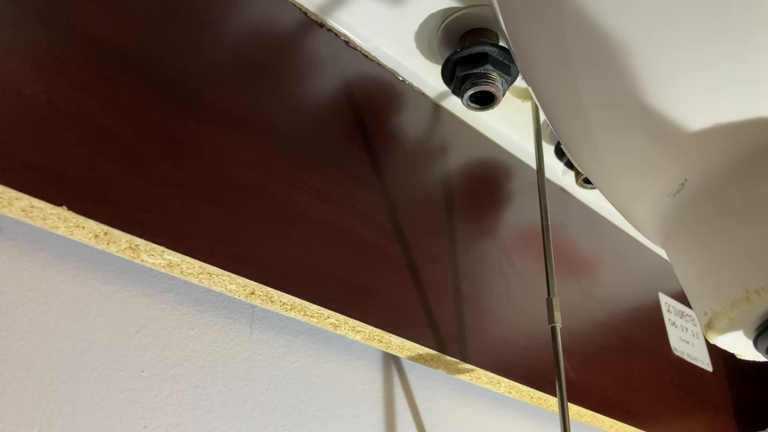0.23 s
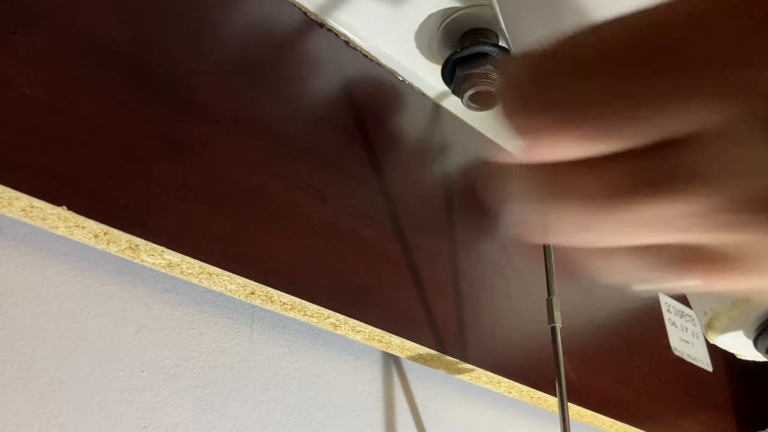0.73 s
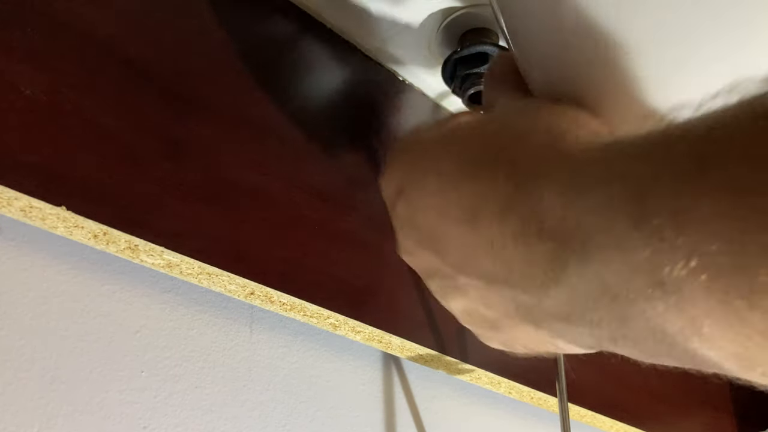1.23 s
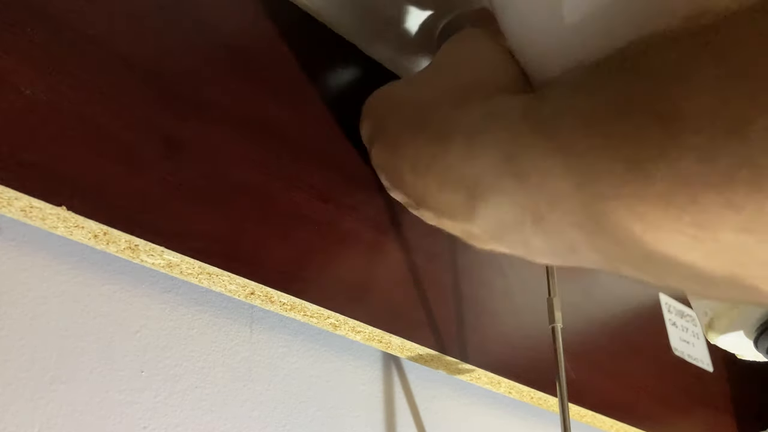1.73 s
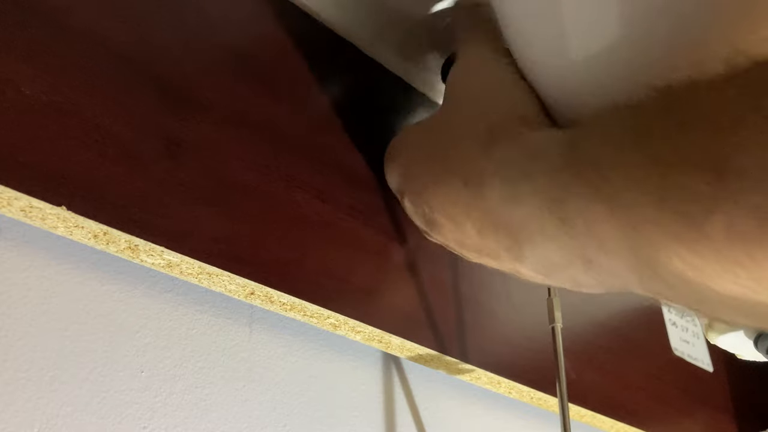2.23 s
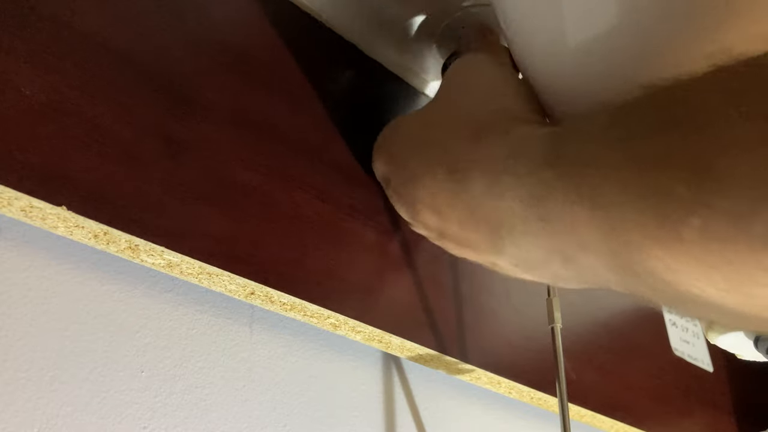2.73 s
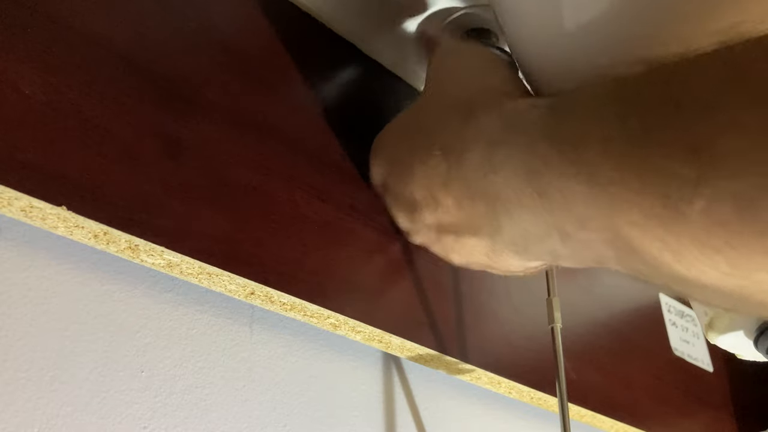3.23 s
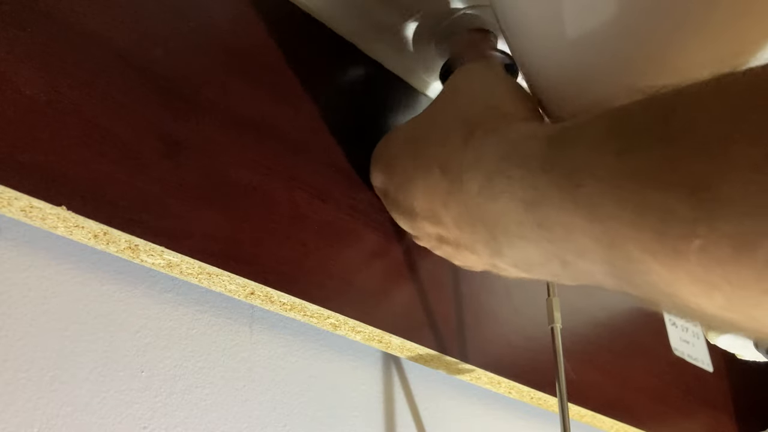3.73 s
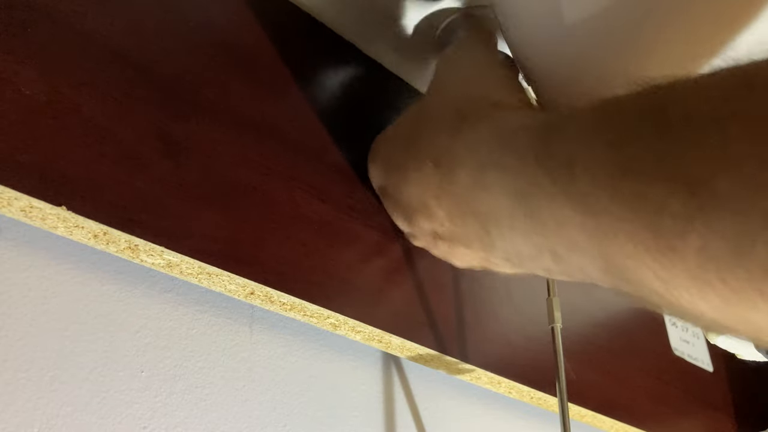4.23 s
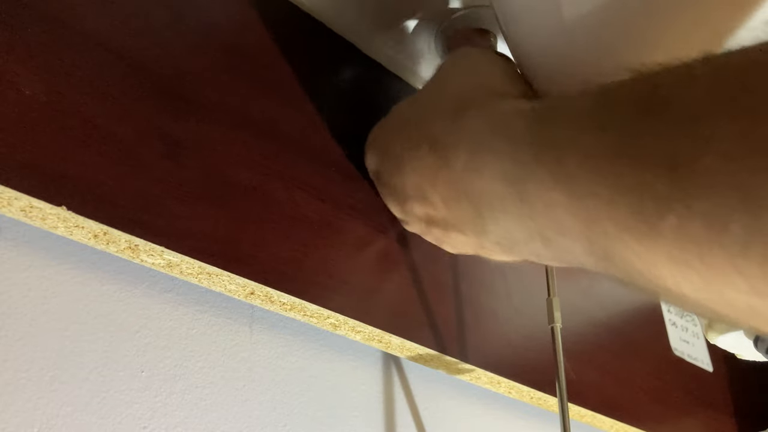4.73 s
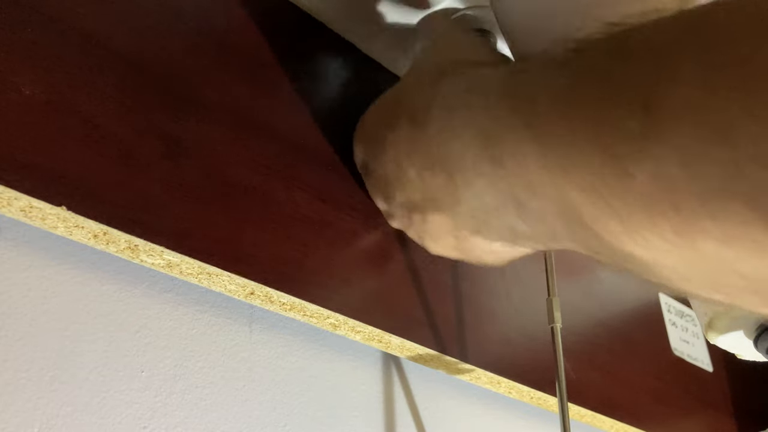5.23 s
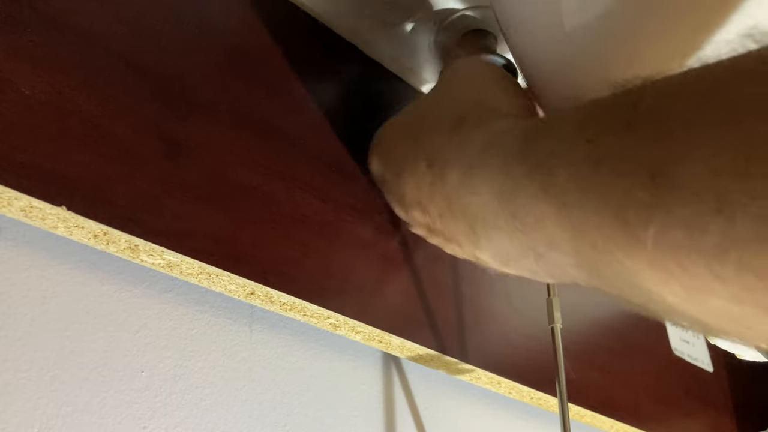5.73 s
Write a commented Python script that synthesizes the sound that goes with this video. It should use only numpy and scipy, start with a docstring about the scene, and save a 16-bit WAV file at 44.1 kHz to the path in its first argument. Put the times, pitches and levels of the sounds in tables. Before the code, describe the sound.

Close under a sink, quick irregular drips plop with a hollow low boom into a tub for about two seconds. A hand brushes in with a soft bump, then turns a plastic nut in dry, scratchy flicks about three a second, with hollow clicks and bright ticks. A sharp bouncing knock rings near the middle; later, dull basin thumps grow stronger. Low rumble and faint room tone lie beneath.

```python
"""Water drips into a tub under a sink, while a hand in the small cabinet unscrews a plastic nut from a tap's shank.
Fingers rub and the thread scratches: stick-slip noise, shaped by pushes and slides of the hand.
Noise bursts make clicks and ticks; decaying modes make bumps on the basin and one sharp, bouncing knock.
Each drip is a splash of noise over two decaying sines; a low filtered rumble and room tone lie underneath."""
import sys
import numpy as np
from scipy import signal
from scipy.fft import rfft, irfft, next_fast_len
from scipy.io import wavfile

SR = 44100
rng = np.random.default_rng(int(sys.argv[2]) if len(sys.argv) > 2 else 0)


def store_wav(level_fs):
    """Save 16-bit WAV to argv[1]."""
    pcm = np.round(np.clip(np.atleast_2d(level_fs), -1, 1) * 32767)
    wavfile.write(sys.argv[1], SR, pcm.T.astype(np.int16))


N = 263718
AGE = np.arange(2 * SR // 5) / SR   # seconds since a contact began; each contact lasts at most 0.4 s

# Resonances and one dip of the scraped nut.
# Each row: centre in Hz, half width in Hz, lift in dB (negative for the dip).
NUT_PEAKS = [(1144, 18.7, 13), (1407, 76, 10.5), (1703, 30, 6), (2230, 15, -14), (3140, 9.8, 16.5),
             (3680, 200, 3.5)]


def amp(db):
    """Decibels to gain."""
    return 10 ** (np.asarray(db) / 20)


def rms_one(x):
    """Scale to rms 1."""
    return x / np.sqrt(np.mean(x ** 2) + 1e-20)


def at_hz(points, hz):
    """Read a curve over frequency on a logarithmic axis."""
    f, value = np.transpose(points)
    return np.interp(np.log(hz + 1), np.log(f), value)


def noise(spectrum, peaks=(), ripple_db=0, size=N):
    """Stereo noise of rms 1, coloured by a spectrum, named peaks and a random ripple of crowded modes."""
    # Likeness of the two channels. Each row: frequency in Hz, correlation from -1 to 1.
    likeness = [(150, 0.97), (550, 0.56), (1200, 0.24), (5000, 0.058)]
    excitation = rng.standard_normal((2, size))
    fft_size = next_fast_len(size)
    hz = np.fft.rfftfreq(fft_size, 1 / SR)
    crowded = np.interp(hz, np.linspace(0, SR / 2, 400), rng.standard_normal(400))
    db = at_hz(spectrum, hz) + ripple_db * crowded
    for f, width, lift in peaks:
        db = db + lift / (1 + ((hz - f) / width) ** 2)
    mid, side = rfft(excitation, fft_size) * amp(db)
    alike = np.clip(at_hz(likeness, hz), -1, 1)
    pair = np.sqrt(1 + alike) * mid + np.sqrt(1 - alike) * side * [[1], [-1]]
    return rms_one(irfft(pair, fft_size)[:, :size])


def fade(t60):
    """Decay by 60 dB in t60 seconds."""
    return np.exp(-np.log(1000) * AGE / t60)


def swell(rise_s):
    """Soft onset that approaches full level with time constant rise_s."""
    return 1 - np.exp(-AGE / rise_s)


def add(out, s, sound):
    """Mix a sound in at time s in seconds."""
    start = max(round(s * SR), 0)
    out[:, start:start + len(AGE)] += sound[:, :out.shape[1] - start]


def burst(spectrum, t60, tail_db, peaks=(), ripple_db=3):
    """A contact on densely spaced modes: noise with a quick decay, then the cabinet's weaker tail."""
    cabinet_t60 = .14   # seconds
    decay = fade(t60) + amp(tail_db) * fade(cabinet_t60)
    return noise(spectrum, peaks, ripple_db, size=len(AGE)) * decay


def ring(modes, vary_db, detune, spread):
    """Struck modes; each blow has its own strengths and tuning, each mode its own phase at the two ears."""
    out = 0
    for hz, db, t60 in modes:
        strength, shift, phase = rng.standard_normal(3)
        ear_phase = spread * phase * np.array([[1], [-1]])   # radians
        turn = 2 * np.pi * hz * (1 + detune * shift) * AGE + ear_phase
        out = out + amp(db + vary_db * strength) * np.sin(turn) * fade(t60)
    return out


def turning(scratch_db=6.0, rub_db=1):
    """Each flick of the fingers has two swells of pressure: they tighten, then push the nut round."""
    # Flicks that spin the nut, about three a second. Each row: middle of the push in seconds,
    # spread (Gaussian sigma) of the push in seconds, thread scratch and skin rub in dB before the trims.
    flicks = [(2.12, 0.023, -49.5, -49.5), (2.487, 0.037, -51, -53.5), (2.851, 0.019, -50.5, -50),
              (3.19, 0.033, -56, -59.5), (3.522, 0.025, -52.5, -55), (3.846, 0.044, -45, -53),
              (4.151, 0.022, -50, -54), (4.487, 0.053, -60.5, -62.5), (4.824, 0.028, -48.5, -53),
              (5.19, 0.024, -57.5, -56.5), (5.479, 0.026, -49.5, -50.5), (5.79, 0.024, -45.5, -50)]
    grip_lead_s, grip_spread_s = 0.062, 0.028
    grip_scratch_db, grip_rub_db = -15.5, -5.5   # against the push
    out, middle = np.zeros((2, N)), AGE.mean()
    for s, push_s, scratch, rub in flicks:
        grip = (s - grip_lead_s, grip_spread_s, scratch + grip_scratch_db, rub + grip_rub_db)
        push = (s, push_s, scratch, rub)
        for at, spread_s, thread_db, skin_db in (grip, push):
            pressure = np.exp(-.5 * ((AGE - middle) / spread_s) ** 2)
            add(out, at - middle, pressure * friction(thread_db + scratch_db, skin_db + rub_db))
    return out


def sliding(scratch_db=4, rub_db=.5):
    """A slide sets in quickly, keeps its pressure and dies as the fingers stop."""
    # The hand reaches in, finds the nut and takes new grips. Each row: start in seconds,
    # length in seconds, thread scratch and skin rub in dB before the trims.
    slides = [(0, 0.061, -56.5, -54), (0.161, 0.036, -76, -58), (0.289, 0.19, -68, -67),
              (0.499, 0.043, -71, -57), (0.999, 0.075, -47, -53), (1.21, 0.08, -78, -69),
              (1.402, 0.34, -94, -65), (1.531, 0.35, -65.5, -61.5), (2.177, 0.11, -64, -62),
              (2.565, 0.06, -54.5, -51), (2.658, 0.016, -59.5, -58), (2.921, 0.098, -75, -54.5),
              (3.039, 0.11, -61.5, -60.5), (3.237, 0.099, -74.5, -59), (3.399, 0.062, -59, -63),
              (3.655, 0.036, -67, -57), (3.717, 0.02, -61.5, -59), (3.94, 0.094, -63.5, -60),
              (4.225, 0.17, -70.5, -60), (4.657, 0.029, -68, -57.5), (4.971, 0.037, -72, -55.5),
              (5.053, 0.084, -59.5, -60.5), (5.243, .08, -70.5, -55.5), (5.357, 0.02, -56.5, -64),
              (5.601, 0.055, -65.5, -57), (5.895, 0.041, -66, -48.5), (5.951, 0.034, -67, -62)]
    attack_s, release_s = .005, .017   # time constants
    out = np.zeros((2, N))
    for s, length, scratch, rub in slides:
        release = np.exp(-np.maximum(AGE - length, 0) / release_s)
        pressure = swell(attack_s) * release
        add(out, s, pressure * friction(scratch + scratch_db, rub + rub_db))
    return out


def friction(scratch_db, rub_db):
    """One touch: plastic scratches while skin slides over the ribs, and each new grip shifts the colour."""
    # Colours of thread scratch and skin rub. Each row: frequency in Hz, relative level in dB per Hz.
    scratch_colour = [(150, -14), (320, 10), (480, -5), (850, -2.5), (1400, -4.5), (2400, -3.5),
                      (2850, -12), (5000, -12), (9000, -38)]
    rub_colour = [(1500, -16.5), (4000, -7), (6000, -8), (8000, 0), (12000, -2.5), (15500, -12.5)]
    coarse = grit(slips_per_s=260, size_db=3.2, slip_t60=.045)
    thread = coarse * noise(scratch_colour, NUT_PEAKS, ripple_db=4.5, size=len(AGE))
    fine = grit(slips_per_s=550, size_db=9.0, slip_t60=0.2)
    skin = fine * noise(rub_colour, ripple_db=6.5, size=len(AGE))
    return amp(scratch_db) * thread + amp(rub_db) * skin


def grit(slips_per_s, size_db, slip_t60):
    """Envelope of stick and slip: tiny releases of uneven size, each dying away, summed in power; rms 1."""
    sizes = amp(size_db * np.minimum(rng.exponential(1, len(AGE)), 3))
    slips = (rng.random(len(AGE)) < slips_per_s / SR) * sizes
    power = irfft(rfft(slips ** 2) * rfft(fade(slip_t60) ** 2), len(AGE))
    return rms_one(np.sqrt(np.abs(power)))


def knocks(crack_db=-8, ring_db=-15.5):
    """The loose nut hits the shank and bounces; each hard crack leaves nut and shank ringing."""
    # Knock and bounces. Each row: start in seconds, level in dB before the trims.
    hits = [(3.8478, -16.5), (3.8531, -21), (3.861, -29), (3.886, -23)]
    # What nut and shank ring with. Each row: frequency in Hz, relative level in dB, t60 in seconds.
    shank_modes = [(956, -19, 0.56), (1390, -2, 0.15), (1385, 6, 0.12), (1600, 1.5, 0.16),
                   (2040, -23, 0.19), (2474, -5, 0.1), (2440, -5.5, 0.11), (3480, -10, 0.11),
                   (4500, -5.5, 0.13), (4950, -1, 0.14), (4893, -1, 0.12), (6270, -15, 0.16),
                   (9840, 4.5, 0.036), (10300, -24, 0.071), (11900, 6.5, 0.031), (12630, 2, 0.045)]
    # Colour of the crack. Each row: frequency in Hz, relative level in dB per Hz.
    crack_colour = [(400, -2), (1100, -33), (1450, 8), (2450, 7), (2850, -20), (3400, -20), (5200, 4),
                    (8500, -8.5), (12000, -6), (16000, 0.5)]
    out = np.zeros((2, N))
    for s, db in hits:
        crack = burst(crack_colour, t60=.04, tail_db=-12)
        tone = ring(shank_modes, vary_db=3.0, detune=0.00052, spread=1.27)
        add(out, s, amp(db) * (amp(crack_db) * crack + amp(ring_db) * tone))
    return out


def clicks(catch_db=-4, tick_db=-7):
    """The nut catches on the thread with a hollow click; fingernail and plastic edges tick brightly."""
    # Thread catches, then bright ticks. Each row: start in seconds, level in dB before the trim.
    catches = [(1.004, -39.5), (1.612, -38.5), (1.643, -41.5), (2.199, -38.5), (2.509, -35), (2.602, -37.5),
               (2.846, -44), (2.913, -45.5), (3.044, -43), (3.461, -40), (3.537, -31), (4.007, -39.5),
               (4.212, -43), (4.308, -43), (4.994, -44), (5.378, -47)]
    ticks = [(0.15, -38.5), (0.183, -35.5), (0.504, -45.5), (0.9, -52), (1.004, -45), (2.4669, -26.5),
             (3.169, -39), (4.543, -45.5), (5.188, -31), (5.571, -43), (5.793, -27.5), (5.8903, -33.5)]
    # Colours of catch and tick. Each row: frequency in Hz, relative level in dB per Hz.
    catch_colour = [(500, 11.5), (1000, -1.5), (1450, 7.5), (1900, 7.5), (2500, 1.5), (3500, -18),
                    (8000, -47)]
    tick_colour = [(1500, -4.5), (5000, 0.5), (8000, 6.5), (11500, 8.5), (16000, -1)]
    out = np.zeros((2, N))
    for s, db in catches:
        click = burst(catch_colour, t60=.055, tail_db=-7, peaks=NUT_PEAKS) * swell(rise_s=.0008)
        add(out, s, amp(db + catch_db) * click)
    for s, db in ticks:
        tick = burst(tick_colour, t60=.025, tail_db=-6)
        add(out, s, amp(db + tick_db) * tick)
    return out


def bumps(upper_db=3):
    """Soft blows of the hand swell into the basin's modes; the grip damps and detunes them."""
    # Dull bumps on the basin. Each row: time in seconds, level of the low modes in dB,
    # level of the upper modes in dB before the trim.
    blows = [(1.02, -34, -41.5), (1.078, -40, -46), (1.704, -34.5, -52.5), (2.101, -32, -66),
             (2.137, -35.5, -54), (2.207, -34, -50), (2.45, -36, -52.5), (2.526, -32, -60),
             (2.614, -35, -53), (2.856, -39, -58), (3.05, -36.5, -63), (3.117, -36, -44.5),
             (3.635, -38.5, -50.5), (3.753, -37.5, -49), (3.811, -40, -34.5), (3.832, -32.5, -31),
             (4.259, -39, -62), (4.396, -36, -58), (4.843, -28, -37), (4.862, -34, -50),
             (4.962, -40.5, -48), (5.058, -33, -46), (5.112, -26, -31), (5.218, -34.5, -48.5),
             (5.373, -37, -46.5), (5.424, -31, -42), (5.519, -35.5, -42), (5.605, -34, -46),
             (5.812, -38.5, -44), (5.935, -32.5, -48.5)]
    # What the basin rings with. Each row: frequency in Hz, relative level in dB, t60 in seconds.
    low_modes = [(101.9, -19, 0.91), (143.7, -3, 0.26), (232, -1.5, 0.11), (292.7, 2, 0.14),
                 (341.3, -4.5, 0.18)]
    upper_modes = [(450.5, 1.5, 0.051), (537.7, 0, 0.079), (605, -16, 0.17)]
    out = np.zeros((2, N))
    for s, db, upper in blows:
        low = amp(db) * ring(low_modes, vary_db=1.5, detune=0.0773, spread=0.25)
        high = amp(upper + upper_db) * ring(upper_modes, vary_db=1.5, detune=0.029, spread=0.23)
        add(out, s - .002, (low + high) * swell(rise_s=0.0022))   # starts 2 ms early
    return out


def drips(boom_db=7, overtone_db=5, splash_db=-29.5):
    """A drop splashes, then the tub's floor swings up and booms; bigger drops do both more loudly."""
    # Drops landing in the tub. Each row: start in seconds, boom in dB before the trims.
    drops = [(0.0, -36), (0.067, -46.5), (0.15, -30), (0.199, -42), (0.238, -40), (0.295, -36),
             (0.438, -31.5), (0.578, -37), (0.71, -32), (0.836, -38), (0.958, -32.5), (1.182, -33),
             (1.288, -39.5), (1.391, -34), (1.488, -40.5), (1.582, -35), (1.755, -35), (1.916, -37.5),
             (1.992, -45.5), (2.062, -41), (2.327, -41)]
    # The tub's note steps up, then its overtone slowly weakens. Each row: time in seconds,
    # boom pitch in Hz, overtone in dB against the boom before the trims.
    tub_note = [(0.44, 217, -22), (0.57, 272.5, -12), (1.2, 270, -14.5), (2.3, 287, -28)]
    # Colour of the splash. Each row: frequency in Hz, relative level in dB per Hz.
    splash_colour = [(500, -5), (780, -1), (970, 4.5), (1100, -3.5), (1280, 9), (1550, -18), (2600, -16),
                     (5000, -47)]
    splash_follows = 0.58   # dB of splash for each dB of boom
    boom_t60, overtone_hz, overtone_t60 = 0.07, 524, 0.13   # seconds, Hz, seconds
    out = np.zeros((2, N))
    when, pitches, overtones = np.transpose(tub_note)
    for s, boom in drops:
        hz = np.interp(s, when, pitches)
        overtone = boom + np.interp(s, when, overtones)
        low = amp(boom + boom_db) * np.sin(2 * np.pi * hz * AGE) * fade(boom_t60)
        sloshing = 1 + 0.019 * rng.standard_normal()   # moving water detunes the overtone
        high_wave = np.sin(2 * np.pi * overtone_hz * sloshing * AGE)
        high = amp(overtone + overtone_db) * high_wave * fade(overtone_t60)
        tub = 2 * (low + high) * swell(rise_s=0.0048) ** 2
        splat = burst(splash_colour, t60=.07, tail_db=-9, ripple_db=1.5) * swell(rise_s=.0005)
        add(out, s, amp(splash_follows * boom + splash_db) * splat + tub)
    return out


def rumble():
    """The cabinet's panels rumble under the moving arm: low noise that follows its leaning."""
    # The arm leans and shifts against the cabinet. Each row: time in seconds, rumble level in dB.
    leaning = [(0, -48), (.98, -52.5), (1.04, -37), (1.2, -49), (1.75, -45.5), (3.58, -47), (3.68, -39),
               (4.03, -42), (4.2, -49), (5.3, -38.5), (5.57, -44), (5.98, -43.5)]
    # Colour of the panels. Each row: frequency in Hz, relative level in dB per Hz.
    panel_colour = [(22, -30), (38, -12), (55, 1.5), (72, -6), (98, 5.5), (140, -4), (190, -17.5),
                    (300, -12), (430, -31), (1500, -67)]
    when, level_db = np.transpose(leaning)
    return amp(np.interp(np.arange(N) / SR, when, level_db)) * noise(panel_colour)


def room_tone(level_db=-53):
    """Steady filtered noise as the quiet bed under everything."""
    # Colour of the bed. Each row: frequency in Hz, relative level in dB per Hz.
    bed_colour = [(25, -20), (60, 2), (130, -6), (300, -5), (500, -23.5), (1300, -30.5), (3000, -40.5),
                  (16000, -45)]
    return amp(level_db) * noise(bed_colour)


def scene():
    """All sounds in the cabinet over the room tone."""
    hand = turning() + sliding() + knocks() + clicks() + bumps()
    return hand + drips() + rumble() + room_tone()


def record(dry, shared_above_hz=6000, cutoff_hz=16200):
    """The left leads and is louder in the middle range; its treble is the right signal, late and inverted."""
    # How much louder the left side is. Each row: frequency in Hz, level difference in dB.
    left_lead = [(100, -1.2), (280, 2.5), (560, 4.5), (1200, 2.5), (2200, 1.5), (5000, 0)]
    size = next_fast_len(N + SR // 10)
    hz = np.fft.rfftfreq(size, 1 / SR)
    left, right = rfft(dry, size)
    right_delay_s = .00047 * hz ** 2 / (hz ** 2 + 400 ** 2)   # the delay vanishes in the bass
    right = right * np.exp(-2j * np.pi * hz * right_delay_s)
    shared = 1 / (1 + (shared_above_hz / (hz + 1)) ** 8)   # share of power taken from the right
    late_right = right * np.exp(-2j * np.pi * hz * .000218)   # a further 0.218 ms
    left = np.sqrt(1 - shared) * left - np.sqrt(shared) * late_right
    balance = amp(at_hz(left_lead, hz) * [[.5], [-.5]])   # half the difference on each side
    pair = irfft(np.array([left, right]) * balance, size)[:, :N]
    lowpass = signal.cheby1(12, .2, cutoff_hz, fs=SR, output="sos")
    return signal.sosfilt(lowpass, pair)


dry = scene()
out = record(dry)
store_wav(out)
```